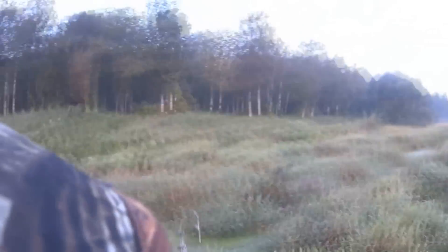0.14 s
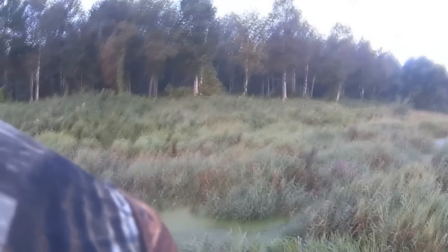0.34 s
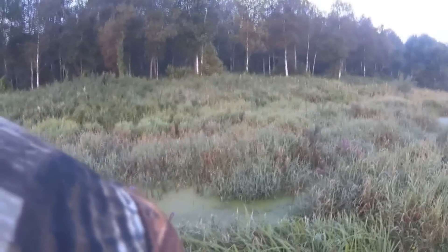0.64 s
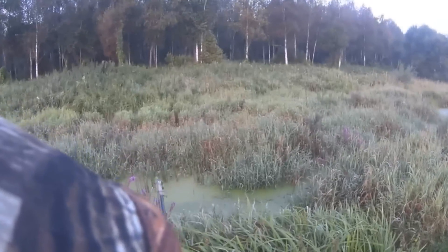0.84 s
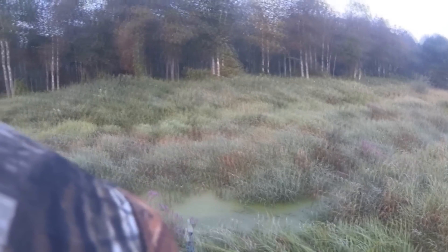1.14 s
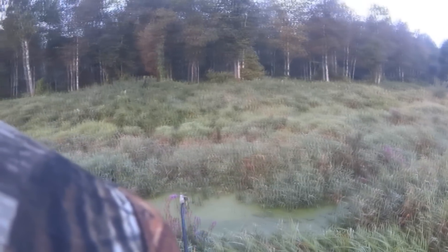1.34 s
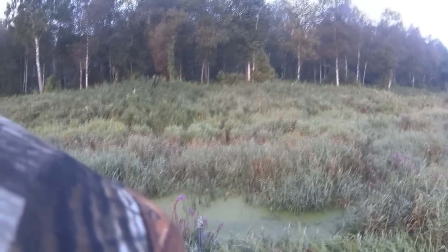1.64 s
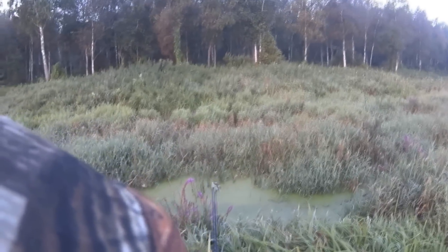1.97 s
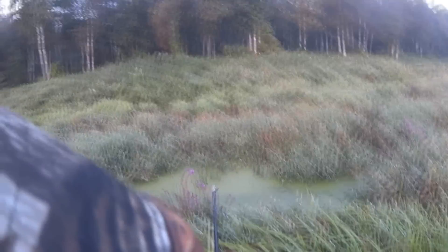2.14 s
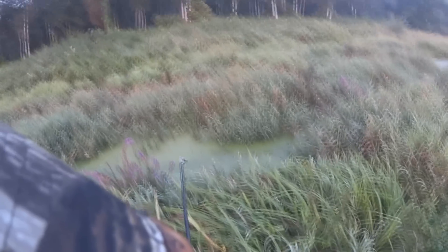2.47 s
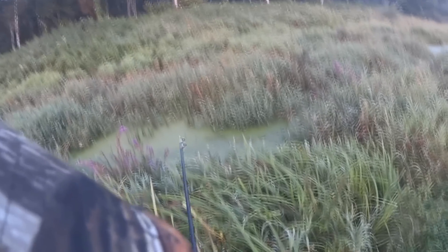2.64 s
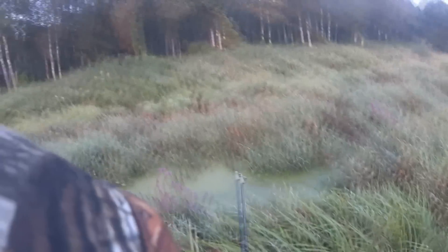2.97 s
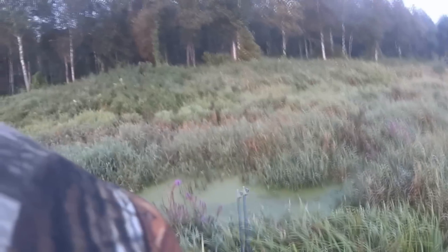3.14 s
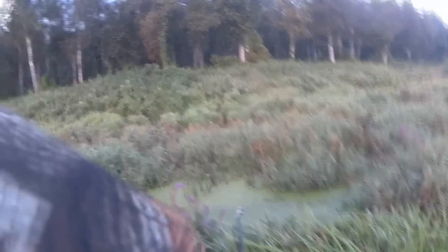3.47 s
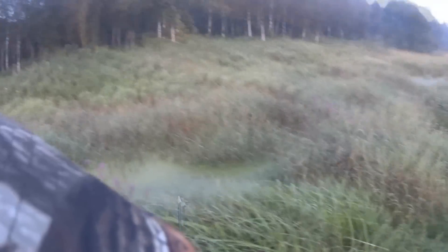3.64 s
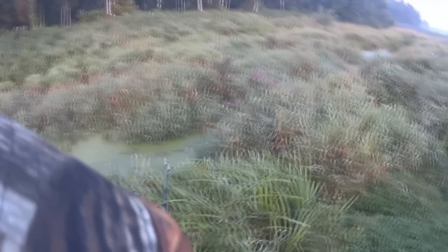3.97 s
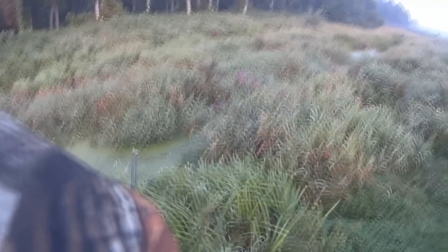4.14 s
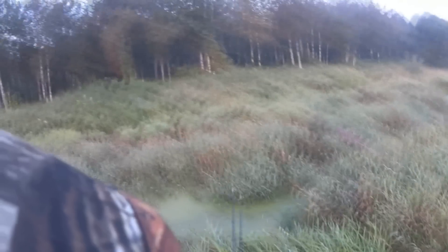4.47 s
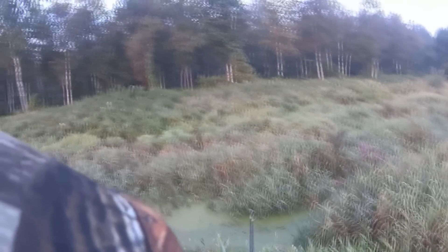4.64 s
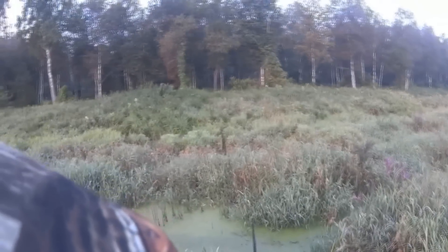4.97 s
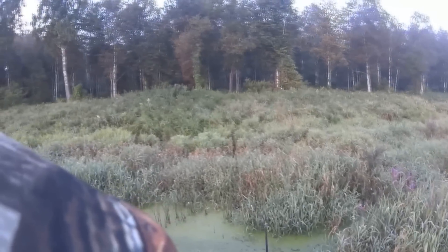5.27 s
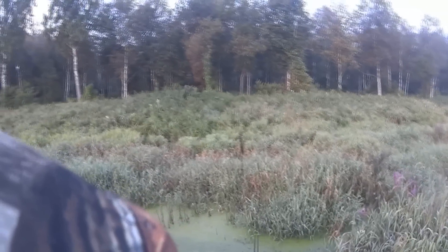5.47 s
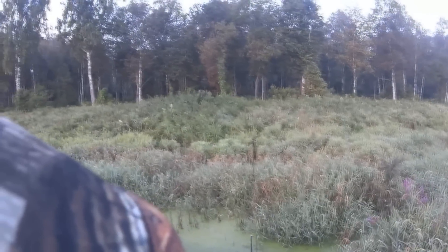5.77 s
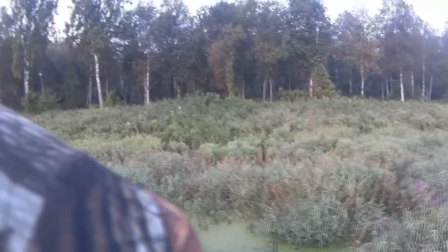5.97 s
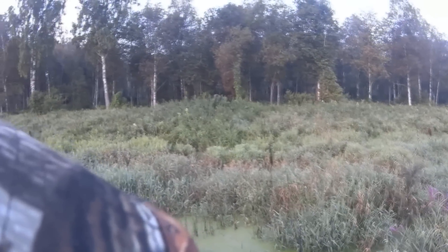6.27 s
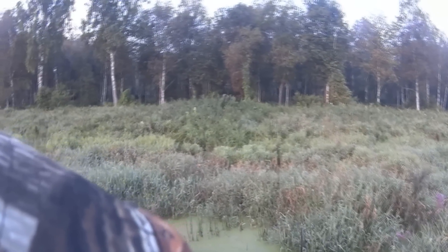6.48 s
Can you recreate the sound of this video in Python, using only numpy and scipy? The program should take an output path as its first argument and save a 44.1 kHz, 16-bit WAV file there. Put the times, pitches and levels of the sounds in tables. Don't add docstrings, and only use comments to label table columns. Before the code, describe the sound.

Dry grass and sleeve cloth scrape in short irregular strokes over a small body-worn camera, with ticking stems and one hard snap at 2.4 seconds.

```python
import sys
import numpy as np
from scipy import signal
from scipy.fft import rfft, irfft
from scipy.io import wavfile
from scipy.ndimage import uniform_filter1d

SR = 44100
rng = np.random.default_rng(int(sys.argv[2]) if len(sys.argv) > 2 else 0)


def elevation(decibels):
    levels = np.asarray(decibels, float)
    return 10 ** (levels / 20)


def digitize_waveform(pressure):
    field = np.atleast_2d(pressure).T
    bounded = np.clip(field, -1, 1)
    quanta = np.round(bounded * 32767).astype(np.int16)
    wavfile.write(sys.argv[1], SR, quanta)


N = 291475


def evened(x):
    return x / np.sqrt(np.mean(x ** 2) + 1e-20)


def colour(x, points):
    f, db = np.transpose(points)
    hz = np.fft.rfftfreq(x.shape[-1], 1 / SR)
    gain = elevation(np.interp(np.log(hz + 1), np.log(f + 1), db))
    return irfft(rfft(x) * gain, x.shape[-1])


def band(x, lo_hz, hi_hz, order=3):
    return signal.sosfilt(signal.butter(order, [lo_hz, hi_hz], "band", fs=SR, output="sos"), x)


def resonate(x, hz, width_hz):
    turn = np.exp(2j * np.pi * np.cumsum(hz * np.ones(x.shape[-1])) / SR)
    r = np.exp(-np.pi * width_hz / SR)
    smooth = signal.lfilter([1 - r], [1, -r], x / turn + 1e-18)
    return 2 * (turn * smooth).real


def drift(size):
    return evened(uniform_filter1d(uniform_filter1d(rng.standard_normal(N), size), size))


def swells(t, rows, rise_share):
    peak_s, length_ms, db = np.transpose(rows)[:3, :, None]
    share = np.clip(rise_share, .05, .95)
    rising, falling = (peak_s - t) / share, (t - peak_s) / (1 - share)
    gone = np.where(t < peak_s, rising, falling) * 1000 / length_ms
    return (elevation(db) * np.cos(np.pi / 2 * np.minimum(gone, 1)) ** 2) ** 2


# frequency in Hz, level in dB per Hz.
HISS_MID = [(19, -30), (36, -3.5), (92, -7.5), (265, -6.5), (393, -6.5), (444, -6.5), (1220, -10.5),
            (2090, -8), (3590, -15.5), (6970, -17.5), (10600, -25), (11400, -18), (14800, -62),
            (22000, -120)]
HISS_SIDE = [(12, -48), (20, -8), (91, -10.5), (316, 0), (598, 1.5), (1050, 2), (5420, -11), (6530, -6),
             (7860, -13), (10500, -19.5), (11400, -12), (14800, -61), (22000, -120)]
# peak time in seconds, length in ms, level in dB.
GUSTS = [(0.05, 140, -65), (0.78, 120, -54), (0.96, 120, -57), (1.77, 250, -55.5), (3.6, 150, -64),
         (3.97, 280, -56), (4.24, 210, -58), (4.92, 400, -55.5), (5.48, 70, -49), (5.52, 76, -44),
         (5.57, 130, -52.5), (6.15, 220, -60), (6.46, 200, -61)]


def background():
    mid_noise, side_noise, wind_noise = rng.standard_normal((3, N))
    breeze_db = -71
    wind = np.sqrt(elevation(breeze_db) ** 2 + swells(np.arange(N) / SR, GUSTS, 0.48).sum(0))
    rumble = evened(band(wind_noise, 22, 57.6, order=2) * elevation(2.8 * drift(size=1500)))
    mid = elevation(-62.5) * evened(colour(mid_noise, HISS_MID)) + wind * elevation(-5.0) * rumble
    side = elevation(-59.5) * evened(colour(side_noise, HISS_SIDE))
    return np.array([mid + side, mid - side])


# frequency in Hz, level in dB.
UNLIKE = [(1000, -15), (2500, -4.5), (5000, -10), (10000, -6)]
# frequency in Hz, left over right in dB.
LEAN = [(60, -4), (110, 0.0), (190, 41), (350, -34), (620, -16), (1120, -4), (2010, 4), (3620, -8.5),
        (6500, -1.5), (11700, -6)]


def ports(common, other, pan_db):
    echo = np.roll(common, shift=11)
    other = colour(.62 * other + .62 * echo, UNLIKE)
    lean = np.array(LEAN) / [1, 2]
    pair = np.array([colour(common + other, lean), colour(common - other, lean * [1, -1])])
    return pair * elevation(np.reshape([pan_db, -pan_db], (2, -1)) / 2)


def slips(per_s, spread_db, smooth_db):
    force = elevation(spread_db * np.minimum(rng.exponential(1, (2, N)), 4.0))
    force = force * rng.choice([-1., 1.], (2, N))
    lets_go = rng.random((2, N)) < per_s / SR
    return evened(force * lets_go) + elevation(smooth_db) * rng.standard_normal((2, N))


def patchy(x, fine_db, broad_db):
    z = signal.stft(x, nperseg=512, noverlap=384)[2]
    fine, broad = rng.standard_normal((2, *z.shape[1:]))
    fine = uniform_filter1d(uniform_filter1d(fine, size=2, axis=0), size=10, axis=1)
    broad = uniform_filter1d(uniform_filter1d(broad, size=12, axis=0), size=6, axis=1)
    flare = elevation(fine_db * evened(fine) + broad_db * evened(broad))
    return signal.istft(z * flare, nperseg=512, noverlap=384)[1][:, :N]


def rings(x, modes, wander):
    total = 0
    for hz, width_hz, db in modes:
        pitch = hz * (1 + wander * drift(size=900))
        total = total + elevation(db) * resonate(x, pitch, width_hz) * np.sqrt(SR / width_hz)
    return evened(total)


# time in seconds, drag in dB.
BRUSH = [(0.0, -61.5), (0.15, -75.5), (0.3, -94), (0.45, -61.5), (1.0, -68), (1.62, -71), (2.03, -68),
         (2.54, -62), (2.8, -65.5), (3.05, -79), (3.62, -77), (3.85, -61), (4.5, -65.5), (5.2, -65.5),
         (5.6, -67), (5.9, -61), (6.3, -74), (6.61, -53)]
# peak time in seconds, length in ms, drag in dB, crispness in dB above the drag.
CATCHES = [(0.478, 33, -42.5, -13), (0.591, 17, -52, -14), (0.937, 48, -55.5, 7), (1.038, 94, -49.5, 4),
           (1.117, 96, -51, 3.5), (1.197, 70, -66.5, 18.5), (1.324, 41, -50, 8.5), (1.492, 53, -45.5, -5),
           (1.862, 107, -44.5, 1.5), (1.925, 100, -44.5, -3.5), (2.101, 95, -44.5, -1.5),
           (2.207, 34, -60, 2.5), (2.27, 57, -43.5, 1), (2.416, 21, -29, -2.5), (3.202, 340, -52.5, 6),
           (3.262, 89, -48.5, 6.5), (3.341, 54, -60, 6), (4.168, 21, -32.5, -9), (4.957, 75, -38, 0.5),
           (5.456, 44, -53.5, -8), (5.81, 42, -42, -3.5), (6.408, 285, -48.5, -3.5), (6.485, 320, -45, -6),
           (6.571, 330, -37, -4)]
SWEEPS = [(0.548, 42, -47.5, 1), (0.713, 150, -45.5, 1), (0.834, 19, -40.5, 8), (0.84, 93, -46, 3.5),
          (1.252, 31, -45.5, 0), (1.382, 175, -48, 5.5), (1.824, 136, -43, 3), (2.381, 234, -45, 0.5),
          (2.737, 90, -59.5, -15), (2.959, 46, -55.5, -5.5), (2.984, 42, -60, -4), (3.244, 23, -49.5, 14),
          (3.54, 76.5, -40.5, 5), (4.146, 196, -44.5, -1), (4.45, 150, -71, 10.5), (4.664, 190, -60.5, 6),
          (4.892, 232, -36.5, 2), (5.03, 244, -35, 2), (5.389, 190, -58, 1), (6.106, 57, -38, -1.5)]
LIFTS = [(0.773, 129, -39.5, -0.5), (0.901, 72.4, -55.5, 9), (1.302, 85, -47, 8), (1.482, 43, -42, -3),
         (1.764, 119, -48, 1), (2.077, 30.2, -50, 3), (2.168, 77, -53.5, -6), (2.493, 187, -57.5, -11),
         (3.403, 84, -52.5, 9.5), (3.943, 104, -65, 0), (4.265, 266, -38.5, -1.5), (4.325, 167, -39, -2),
         (4.79, 151, -59, 3), (4.83, 40.5, -40, -3), (5.72, 141, -39, -1.5), (6.206, 262, -62.5, -4.5)]


def pressure():
    t = np.arange(0, N + 32, 32) / SR
    brush_tilt_db = np.array([[0], [-1], [-5.5]])
    power = elevation(np.interp(t, *np.transpose(BRUSH)) + brush_tilt_db) ** 2
    for rows, rise_share in [(CATCHES, 0.22), (SWEEPS, 0.48), (LIFTS, 0.67)]:
        crisp_db = np.transpose(rows)[3]
        airy_db = crisp_db - 8.5
        tilt = elevation(np.array([0 * crisp_db, crisp_db, airy_db])) ** 2
        power = power + tilt @ swells(t, rows, rise_share)
    return np.array([np.interp(np.arange(N) / SR, t, g) for g in np.sqrt(power)])


# frequency in Hz, level in dB per Hz.
SHELL = [(410, -21), (700, -21), (971, -83), (1300, -42), (1600, -17), (2330, -0.5), (3390, -1.5),
         (4280, -3), (6070, -12), (8030, -21.5), (10100, -16), (11000, -17.5), (11400, -78), (14800, -61),
         (22000, -120)]
# frequency in Hz, width in Hz, level in dB.
SHELL_MODES = [(1850, 45, -49), (2100, 62, 1), (2223, 93, 6.5), (2545, 25, 2), (4250, 110, -0.5),
               (5050, 310, 4), (5870, 79, -2), (7090, 210, -10.5), (9740, 310, -12.5)]


def rubbing():
    grip = elevation(1.16 * drift(size=50) + 1.0 * drift(size=300))
    fibres = slips(3500, 2.4, -4.5) * grip
    shell = evened(colour(fibres, SHELL)) + elevation(-2.5) * rings(fibres, SHELL_MODES, 0.025)
    body = patchy(shell, 3.24, 1.4)
    bands = np.array([band(body, 1080, 2800, order=2), band(body, 3410, 7330), band(body, 7230, 11060)])
    bands /= np.sqrt(uniform_filter1d(bands[:, :1] ** 2, size=6000))
    common, other = (pressure()[:, None] * bands).sum(0)
    return ports(common, other, 4)


# frequency in Hz, width in Hz, level in dB.
BUCKLE_MODES = [(1676, 26, 2.5), (3110, 16, -2), (3970, 43, 1), (5140, 44, -18), (5630, 72, -9.5),
                (5700, 130, -0.5), (6130, 105, 2)]
# time in seconds, level in dB.
BUCKLE = [
    (.45, -1),
    (.8, 5.5),
    (1.45, 6.5),
    (1.9, 3),
    (2.38, 0.5),
    (2.4, -51),
    (3.1, 6),
    (3.7, -35),
]


def buckle(touch):
    n = 4 * SR
    shaken = touch[:, :n] * elevation(np.interp(np.arange(n) / SR, *np.transpose(BUCKLE)))
    ring = sum(elevation(db) * resonate(shaken, hz, width_hz) for hz, width_hz, db in BUCKLE_MODES)
    return np.pad(ring, [(0, 0), (0, N - n)])


def bursts(events, low, high, t60_s, pan_db):
    out, t = np.zeros((2, N + 2500)), np.arange(2500) / SR
    for s, db, hz in events:
        puff = rng.standard_normal((2, len(t))) * elevation(-60 * t / t60_s)
        puff[0, 3] += 5.0
        puff = band(puff, max(low * hz, 150), min(high * hz, 14000))
        at = round(s * SR)
        out[:, at:at + len(t)] += elevation(db - 2.5) * ports(*puff, pan_db) / abs(puff[0]).max()
    return out[:, :N]


# start in seconds, peak level in dB, centre frequency in Hz.
TICKS = [(0.1803, -55, 4040), (0.4775, -24.5, 4020), (0.5327, -31, 4200), (0.547, -32.5, 3860),
         (0.5884, -39, 3540), (0.8096, -28, 6200), (0.8466, -23, 5200), (0.931, -34, 5700),
         (1.0345, -20.5, 4330), (1.1014, -36.5, 4000), (1.1929, -28, 5040), (1.537, -41.5, 4000),
         (1.3545, -17.5, 4500), (1.3924, -26, 5870), (1.4709, -48, 4000), (1.7459, -43, 3970),
         (2.124, -36, 3550), (2.2582, -35, 3780), (2.442, -30.5, 4890), (2.905, -44, 5460),
         (3.242, -40, 5930), (3.259, -40, 5980), (3.2694, -19.5, 4280), (3.8284, -39, 4600),
         (3.9395, -28.5, 4250), (4.13, -24, 4730), (4.17, -22, 4020), (5.1916, -44, 4530),
         (4.9563, -17, 4200), (6.3923, -37, 5370)]


def ticks():
    return bursts(TICKS, 0.52, 1.67, t60_s=0.019, pan_db=4.8)


# start in seconds, peak level in dB, centre frequency in Hz.
KNOCKS = [(0.4762, -36, 2880), (0.5324, -33.5, 1890), (0.55, -40, 1580), (0.5904, -40, 2020),
          (1.1026, -39, 1910), (1.7455, -32.5, 2340), (2.954, -39.5, 2120), (2.9814, -44.5, 2100),
          (3.9404, -44, 1960), (4.8519, -25.5, 2100), (5.4526, -42, 1700), (5.4794, -35.5, 1920),
          (6.191, -45, 2180), (6.3906, -29, 2800), (6.42, -29.5, 2520), (0.477, -54.5, 520),
          (0.478, -50, 1180), (1.865, -56, 510), (2.411, -61, 300), (0.55, -62, 560)]


def knocks():
    return bursts(KNOCKS, 0.82, 1.13, t60_s=0.037, pan_db=3.5)


# start in seconds, end in seconds, start frequency in Hz, end frequency in Hz, level in dB.
ZIPS = [(.74, .8, 2350, 2250, -46), (4.14, 4.19, 1350, 1500, -55), (4.158, 4.19, 2400, 2410, -35),
        (4.17, 4.35, 870, 850, -66), (4.25, 4.33, 2400, 2280, -41), (4.83, 4.87, 2100, 2250, -45),
        (4.86, 4.94, 750, 880, -63), (4.215, 4.25, 2700, 2800, -42), (5.01, 5.05, 880, 780, -61),
        (5.04, 5.09, 2230, 2300, -35), (6.55, 6.61, 2400, 2350, -44), (4.965, 5.075, 2100, 1170, -43),
        (6.46, 6.515, 2820, 3020, -40), (6.54, 6.585, 4050, 4600, -43)]


def zips():
    out = np.zeros((2, N + SR))
    for start_s, end_s, start_hz, end_hz, db in ZIPS:
        n = round((end_s - start_s) * SR)
        glide = start_hz + (end_hz - start_hz) * np.linspace(0, 1, n) ** 1.4
        fuzz = resonate(rng.standard_normal((2, 9000))[:, :n], glide, 58)
        tone = np.sin(2 * np.pi * np.cumsum(glide) / SR) + .45 * evened(fuzz)
        out[:, round(start_s * SR):][:, :n] += elevation(db) * tone * np.sqrt(np.hanning(n))
    return ports(*out[:, :N], 0.92)


# frequency in Hz, level in dB, time to fall 60 dB in seconds.
SNAP = [(580, -7, 0.05), (1180, -8, 0.12), (1800, -35, 0.033), (2120, 14, 0.03), (2340, -9, 0.032),
        (2930, 8, 0.018), (4090, 20, 0.0063), (4980, 6.5, 0.0088), (5980, 4, 0.02), (7600, -25, .01),
        (9800, 8, 0.0089)]


def snap():
    start_s, peak_db = 2.4097, -8.5
    t = np.arange(5000) / SR
    blow = 0.029 * rng.standard_normal((2, len(t))) * elevation(-60 * t / 0.077)
    blow[:, [0, round(.0022 * SR)]] = [[.35, -1], [.2, -.4]]
    modes = sum(elevation(db - 60 * t / t60_s) * np.cos(2 * np.pi * hz * t) for hz, db, t60_s in SNAP)
    ring = band(signal.fftconvolve(blow, modes[None])[:, :len(t)], 1010, 8700)
    out = np.zeros((2, N))
    out[:, round(start_s * SR):][:, :len(t)] = elevation(peak_db) * ports(*ring, 0.4) / abs(ring[0]).max()
    return out


def scene():
    touch = rubbing() + ticks()
    return background() + touch + buckle(touch) + knocks() + zips() + snap()


# frequency in Hz, level in dB.
EDGE = [(10950, 0), (11050, -3), (11160, -30), (12250, -44), (12350, -90)]


def band_limited(x):
    return colour(x, EDGE)


def low_pass(x):
    return signal.sosfilt(signal.butter(12, 12270, fs=SR, output="sos"), x)


def record(dry):
    mix = band_limited(dry)
    return low_pass(mix)


dry = scene()
out = record(dry)
digitize_waveform(out)
```